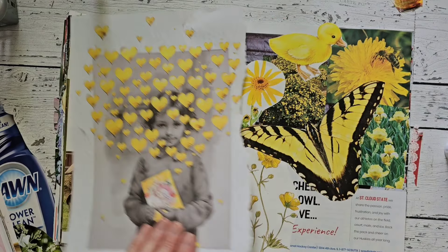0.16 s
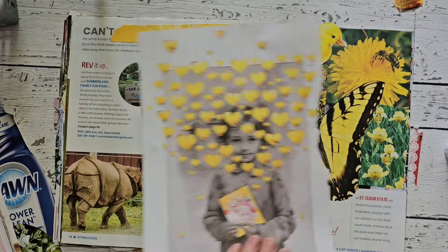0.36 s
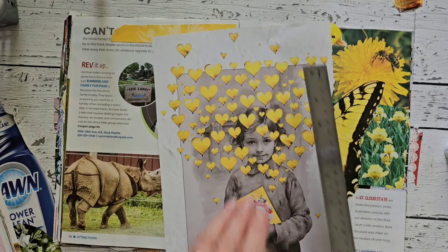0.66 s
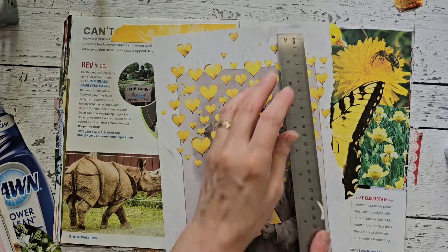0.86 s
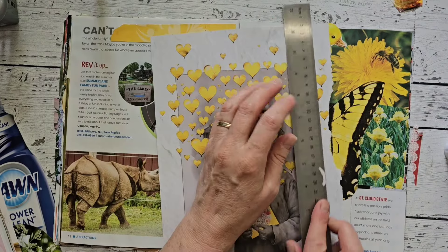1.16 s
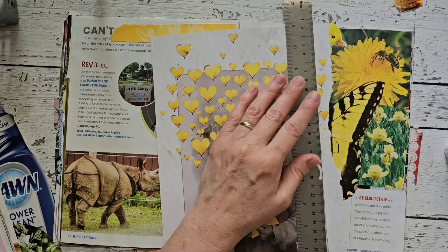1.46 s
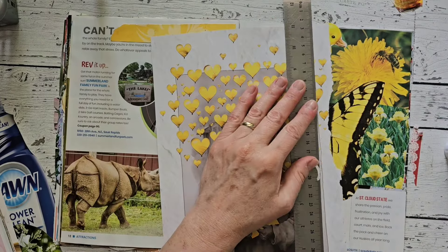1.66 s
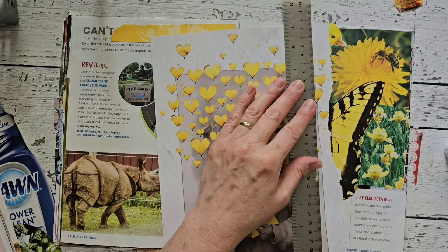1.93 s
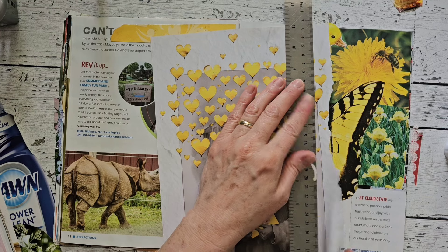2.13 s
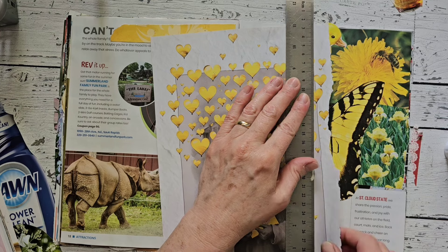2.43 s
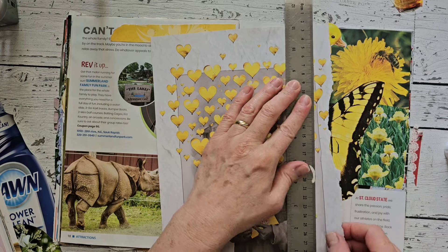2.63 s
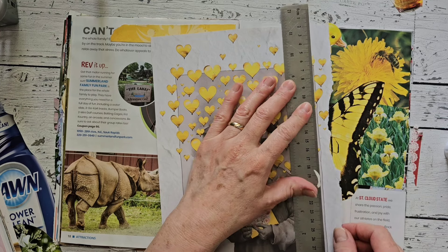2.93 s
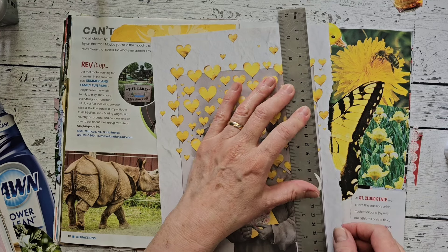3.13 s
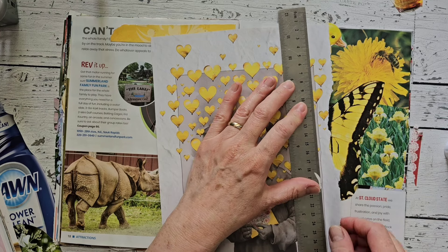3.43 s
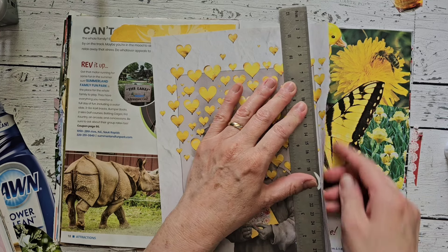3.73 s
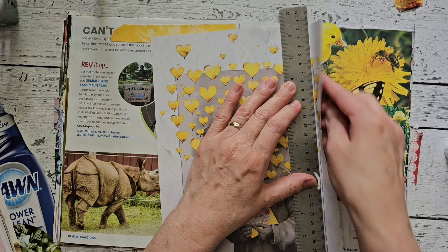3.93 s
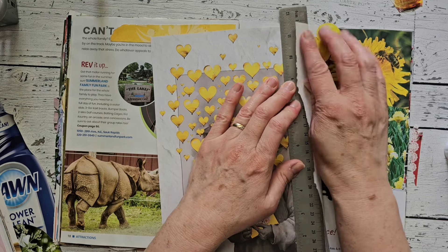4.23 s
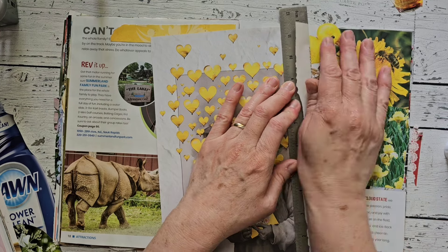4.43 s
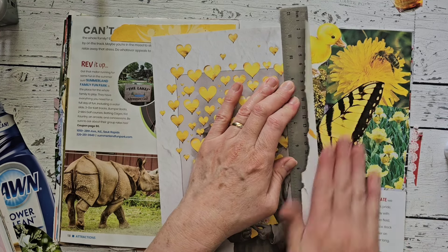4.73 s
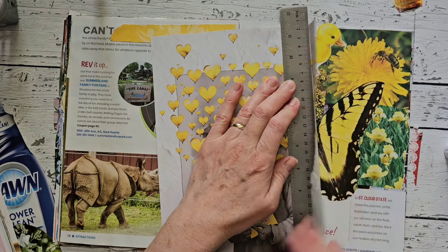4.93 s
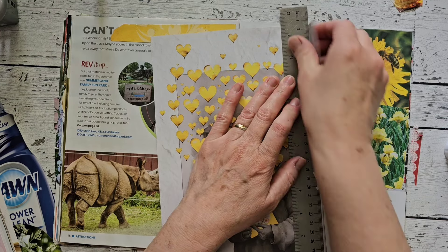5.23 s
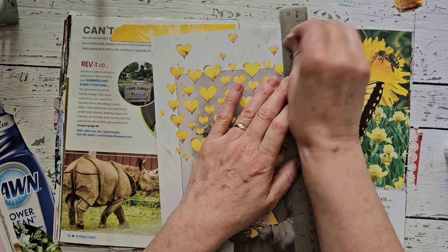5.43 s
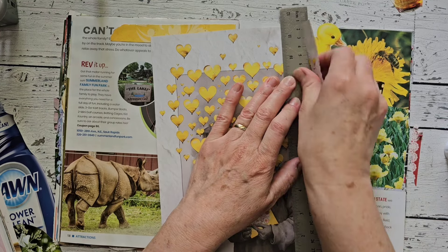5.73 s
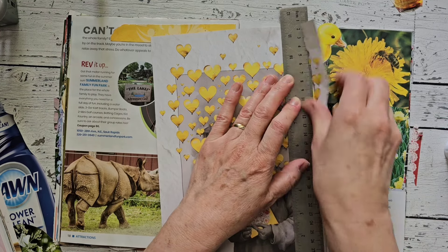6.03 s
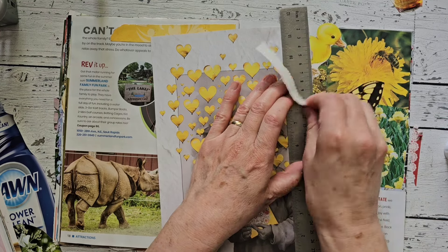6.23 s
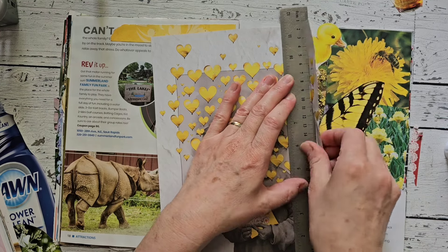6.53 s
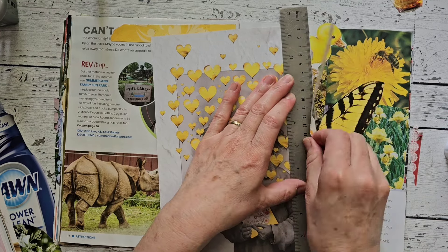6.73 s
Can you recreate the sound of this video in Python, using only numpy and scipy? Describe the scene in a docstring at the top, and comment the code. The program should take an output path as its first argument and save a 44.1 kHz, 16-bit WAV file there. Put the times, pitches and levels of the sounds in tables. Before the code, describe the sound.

A close overhead stereo microphone in a small dry room, with low rumble, faint hiss and a steady soft hum throughout. From 0 to 0.6 s a page glides over a magazine in light papery swishes. At about 0.55 s a ruler squeaks faintly, then from 0.75 to 1.2 s it chatters and sings thinly as it is placed. After a brief quiet, fingers rub the margin: two strong short scuffs near 1.9 and 2.05 s, a crisp snap at 2.5 s, more strokes until 3. Between 3.35 and 5.2 s the edge is folded and smoothed, with a hollow sinking rub around 4.5 s and dull bumps from 3.8 s. Loud crisp rips burst at 5.35 and 5.4 s, softer tears near 5.5, 5.75 and 5.87, then sharp rips at 6.1 and 6.2 s with a bright snap. Small ticks, rustles and low bumps follow to the end near 7 s.

```python
"""A page glides over a magazine on a craft table, in fine grains of filtered noise, with a low hum throughout.
The sheet snaps in brief rings as it buckles; fingertips squeak faintly; a steel ruler chatters and sings in its
bending modes. The margin is folded up and smoothed by hand, with hollow wobbles and table bumps of boom and
dull knock, then torn off along the ruler in short rips of clumped noise. A close stereo microphone overhead, in
a small dry room with a few near echoes and a short tail."""
import sys
import numpy as np
from scipy import signal
from scipy.fft import rfft, irfft
from scipy.io import wavfile
from scipy.ndimage import uniform_filter1d

SR = 44100
rng = np.random.default_rng(int(sys.argv[2]) if len(sys.argv) > 2 else 0)


def to_wav(sig):
    """Store sig (one row per channel, or 1-D mono) as 16-bit WAV at the path in sys.argv[1].

    Samples outside -1..1 are clipped; the rate is SR.
    """
    pcm = np.clip(np.atleast_2d(sig), -1, 1) * 32767
    pcm = np.round(pcm).astype(np.int16)
    wavfile.write(sys.argv[1], SR, pcm.T)  # frames by channels


N = 303040
HZ = np.fft.rfftfreq(N, 1 / SR)
TIME = np.arange(N) / SR

# Colour of the room's air noise. Each row: frequency in Hz, relative density in dB per Hz.
AIR_COLOUR = [(12, 4), (20, 5), (68, 0), (120, 4.5), (168, -12), (277, -7.5), (347, -22.5), (527, -19.5),
              (660, -26.5), (1090, -26.5), (1440, -25.5), (4300, -30), (7310, -33), (9950, -45),
              (16000, -40.5)]
# Hum tones. Each row: frequency in Hz, mean level in dB.
HUM_TONES = [(118.4, -58.5), (242.2, -77)]
# A faint steady room tone, one row: frequency in Hz, width in Hz, level in dB.
ROOM_WHINE = (1090, 38, -78)
# Likeness of left and right in the air. Each row: frequency in Hz, coherence from 0 to 1.
AIR_COHERENCE = [(60, 0.95), (130, 0.92), (300, 0.53), (1000, 0.15), (4000, 0.072), (15000, .05)]
# Likeness of left and right in the paper. Each row: frequency in Hz, coherence from 0 to 1.
PAPER_COHERENCE = [(200, 1), (1300, 0.51), (3000, 0.59), (7000, 0.27), (15000, 0.17)]
# The page gliding over the magazine. Each row: start in seconds, length in seconds, hiss level in dB.
PAGE_SLIDES = [(0, 0.29, -60), (0.107, 0.034, -55), (0.306, 0.094, -52), (0.377, 0.063, -60.5),
               (0.531, 0.056, -71), (0.725, 0.47, -63.5), (0.91, 0.15, -59), (1.177, 0.056, -58.5)]
# Fingers creasing and smoothing the margin.
# Each row: start in seconds, length in seconds, hiss level in dB, fizz re hiss in dB.
MARGIN_RUBS = [(1.541, 0.16, -67.5, -1.5), (1.933, 0.047, -43, -9.5), (1.977, .055, -59, 3),
               (2.049, 0.093, -42, -8.5), (2.156, 0.24, -58, -5.5), (2.393, 0.21, -58.5, -1),
               (2.628, 0.092, -57, -6), (2.751, 0.16, -49, -3), (2.943, 0.066, -52.5, -5),
               (3.35, 0.17, -59, 3.5), (3.557, 0.39, -53.5, 0.5), (3.89, 0.12, -71, 6),
               (3.993, 0.039, -55, 4), (4.03, .15, -52.5, -3), (4.202, .13, -60, -0.5),
               (4.314, 0.088, -52, -2), (4.382, 0.1, -57.5, -4), (4.487, 0.39, -52.5, 5),
               (4.9, 0.034, -54, -4), (5.047, .1, -61, -1), (5.14, 0.14, -64, -4.5),
               (5.611, 0.11, -56, -6.5), (5.812, 0.23, -66, -5), (5.966, 0.082, -50.5, -7),
               (6.34, 0.11, -58, -9), (6.446, 0.28, -70.5, -2), (6.53, 0.03, -54, -10)]
# Colour of rubbed paper. Each row: frequency in Hz, relative density in dB per Hz.
RUBBED_COLOUR = [(110, -4), (180, 0.5), (419, -29.5), (496, -10.5), (793, -13.5), (1180, -5.5),
                 (1710, -7.5), (3300, -2), (3910, -2.5), (4630, 1), (6870, -7.5), (7550, -6.5),
                 (10400, -17.5), (15100, -14), (16000, -70)]
# The hollow under the folded margin, sinking as the hand works along it.
# Each row: time in seconds, resonance in Hz, level re the sheet's plain body in dB.
FOLD_HOLLOW = [(3.55, 2130, -25), (3.62, 2130, 4), (3.9, 2040, -23), (4.2, 1480, -18), (4.42, 1330, -9),
               (4.58, 1070, 5.5), (4.68, 1050, -45)]
# Sharp snaps: the sheet buckling or slapping down, and fibres cracking within the rips. Each row: time in
# seconds, relative strength in dB, ring in Hz.
SHEET_SNAPS = [(.368, -37.5, 1040), (0.4544, -20.5, 6250), (0.905, -39, 1020), (1.24, -33.5, 1090),
               (2.054, -21.5, 3540), (2.149, -30.5, 4600), (2.231, -23.5, 2420), (2.258, -28, 2370),
               (2.349, -38.5, 1500), (2.519, -7.5, 3670), (2.732, -33.5, 2240), (3.441, -33, 1410),
               (3.569, -38, 3050), (4.108, -34.5, 1950), (4.5, -43, 1180), (4.584, -47, 1110),
               (4.693, -25, 2850), (5.367, -24.5, 1470), (5.391, -17, 4800), (5.419, -13, 7350),
               (5.663, -36.5, 1430), (5.74, -18, 7500), (5.836, -43, 1260), (6.094, -36.5, 2000),
               (6.151, -25, 1020), (6.193, -8.5, 5650), (6.285, -25, 3730), (6.608, -19, 7200),
               (6.836, -36.5, 1270)]
# Faint squeaks of fingertips on the page. # Each row: start in seconds, length in seconds, pitch in Hz, level
# in dB.
FINGER_SQUEAKS = [(0.54, 0.12, 1375, -69), (1.59, 0.224, 3280, -69.5)]
# The ruler dragged into place. Each row: time in seconds, relative level in dB.
RULER_DRAG = [(.56, -90), (.75, -97), (.87, -68), (.96, -68), (1.06, -73), (1.21, -71), (1.28, -89)]
# The ruler's bending modes. Each row: frequency in Hz, relative level in dB, free 60 dB decay in seconds.
RULER_MODES = [(2210, -15.5, 0.085), (4270, 2.5, 0.051), (4600, -9, 0.076), (5300, -16, 0.089),
               (8100, -19, 0.3), (11460, -17, 0.26), (12250, -14, 0.12)]
# The ruler touching down and shifting. Each row: time in seconds, relative strength in dB.
RULER_CLINKS = [(.7538, -30), (0.9443, -29), (0.9529, -28), (1.2, -38)]
# Hands bumping the table. Each row: time in seconds, relative strength in dB, boom in Hz.
TABLE_BUMPS = [(1.318, -45, 161), (2.181, -35.5, 73), (3.788, -40, 81.6), (3.819, -35, 86),
               (4.019, -30.5, 51.7), (4.11, -26, 69), (4.185, -35, 57), (4.693, -31.5, 83.5),
               (4.995, -26, 68.3), (5.033, -34.5, 77.5), (5.347, -27.5, 107), (5.385, -28.5, 70),
               (5.549, -38, 96), (5.624, -34.5, 74), (5.739, -34.5, 179), (5.904, -38.5, 154),
               (5.97, -30.5, 78), (6.109, -34, 77), (6.279, -32, 117), (6.356, -37, 67.5),
               (6.407, -41.5, 161), (6.541, -36.5, 105), (6.602, -38, 83), (6.696, -36, 129),
               (6.789, -35.5, 99), (6.823, -33, 98.5)]
# The loose sheet bowing with a hollow wobble. Each row: time in seconds, relative strength in dB.
SHEET_FLAPS = [(1.322, -56), (1.927, -48.5), (1.957, -44), (1.994, -57), (4.908, -52.5), (4.996, -58),
               (6.698, -53)]
# Short pulls that tear the strip. Each row: start in seconds, rise in seconds, length in seconds,
# hiss level in dB, first body re hiss in dB, fizz re hiss in dB.
TEARING_PULLS = [(2.252, 0.0011, 0.0033, -41.5, -3, 2.5), (5.3481, 0.0012, 0.079, -30.5, -9, 2.5),
                 (5.408, 0.0064, 0.05, -33, -20, -2.5), (5.497, 0.03, 0.049, -45, -9, -4),
                 (5.733, 0.025, 0.051, -43.5, -12, 9.5), (5.869, 0.0074, 0.0074, -40.5, -5, -2),
                 (6.106, 0.00057, 0.078, -30.5, -7.5, -7.5), (6.178, 0.0024, 0.029, -29, -18, .5),
                 (6.248, 0.016, 0.034, -46.5, -11, -1), (6.283, 0.00084, 0.011, -45, -3, 1.5),
                 (6.402, .001, 0.0063, -57, 2, 3.5), (6.605, 0.0031, 0.0065, -39, -9, 0.5),
                 (6.786, 0.0023, 0.0076, -50, 2, 1.5), (6.794, 0.018, 0.14, -58.5, 3, 9.5)]
# Colour of torn paper. Each row: frequency in Hz, relative density in dB per Hz.
TORN_COLOUR = [(250, -27.5), (420, -9), (653, -6.5), (772, -10.5), (1020, -2.5), (1220, -10), (1360, -7),
               (1810, -8.5), (3140, -21), (4380, -14), (6420, -18), (7590, -15.5), (10100, -27.5),
               (11600, -20), (16000, -28)]
# Decay of the small room. Each row: frequency in Hz, 60 dB decay in seconds.
ROOM_DECAY = [(150, 0.23), (1000, 0.093), (4000, 0.11), (9000, 0.13), (16000, 0.15)]
# Echoes off things close by. Each row: nominal delay in seconds, level re direct sound in dB.
NEAR_ECHOES = [(.0062, -13), (.0071, -32), (0.0099, -34)]

AIR_DB = -53.5
SLIDE_BODY_DB, SLIDE_FIZZ_DB = -8, -3  # re the hiss
RUB_BODY_DB, USUAL_RUB_DB = -1.5, -57  # body re hiss in a rub of usual strength
DULLING = 0.43  # dB of body re hiss gained for each dB that a rub is slower
SWELL = 0.46  # a stroke's level follows its speed to this power
RUMBLE_DB = -12.5  # the table top under a rubbing hand, re the paper's body
BEND_S, BEND_DB, BEND_BODY_DB, BEND_FIZZ_DB = 0.032, -59.5, 2, -3  # the sheet rustles through each snap
HOLLOW_WIDTH_HZ = 660
PAGE_SHARE = 0.16  # dB more of the whole page for each dB that a snap is harder
# Knock re bump strength at an 80 Hz boom; a brisker touch booms higher and knocks more.
KNOCK_DB, KNOCK_DB_PER_OCTAVE = -9.5, 7.5
FLAP_HZ = 594
RIP_SAG_DB_PER_S, RIP_RELEASE_S = 217, 0.015  # the pull slackens once the paper gives
LOOSENING_DB_PER_S = 149  # the freed strip grows longer and gives more body
TUG_DB = -13.5  # the table thrums as each pull tugs on it, re the rip's hiss
EDGE_HZ = 16100  # the recorder's upper limit


def gain_of(db):
    """Decibels to amplitude."""
    return 10 ** (np.asarray(db) / 20)


def evened(x):
    """Scales to an rms of one."""
    return x / np.sqrt(np.mean(x ** 2) + 1e-20)


def read(points, hz):
    """Reads a table on a log-frequency axis."""
    f, value = np.transpose(points)
    return np.interp(np.log(hz + 1), np.log(f + 1), value)


def add(mix, s, sound):
    """Mixes rows of samples in at time s."""
    part = mix[:, max(round(s * SR), 0):][:, :sound.shape[-1]]
    part += sound[..., :part.shape[1]]


def band(x, low_hz, high_hz, order=2):
    """Causal band-pass."""
    edges = [low_hz, min(high_hz, SR / 2 - 1)]
    return signal.sosfilt(signal.butter(order, edges, "band", fs=SR, output="sos"), x)


def ringing(spectrum, hz, width_hz):
    """Passes a spectrum through one resonance."""
    return irfft(spectrum / (1 + 2j * (HZ - hz) / width_hz) ** 2, N)


def wander(rate_hz):
    """Slow chance with an rms of one, made on a coarse clock."""
    s = TIME[::32]
    hz = np.fft.rfftfreq(len(s), s[1])
    slow = rfft(rng.standard_normal(len(s))) / (1 + (hz / rate_hz) ** 4)
    return np.interp(TIME, s, evened(irfft(slow, len(s))))


def noise_pair(same, lag_ms=0):
    """Spectra of two partly alike white noises, the left one late by the lag."""
    left, other = rfft(rng.standard_normal((2, N)))
    c = np.clip(read(same, HZ), -1, 1)
    late_left = left * np.exp(-2j * np.pi * HZ * lag_ms / 1000)
    right = c * left + np.sqrt(1 - c ** 2) * other
    return np.array([late_left, right])


def background():
    """Low room rumble, faint hiss, a wavering hum and a thin whine."""
    air = noise_pair(AIR_COHERENCE) * gain_of(read(AIR_COLOUR, HZ))
    out = gain_of(AIR_DB) * evened(irfft(air, N))
    for hz, db in HUM_TONES:
        level = gain_of(db + 0.7 * wander(7.7)) * np.sqrt(2)
        out += level * np.sin(2 * np.pi * hz * TIME + 0.5 * wander(5.4))
    whine_hz, width_hz, whine_db = ROOM_WHINE
    return out + gain_of(whine_db) * evened(ringing(noise_pair(AIR_COHERENCE), whine_hz, width_hz))


def grains(per_s, spread_db, grain_s, smooth):
    """Tiny fibre slips of very unequal size over a share of smooth friction."""
    sizes = gain_of(spread_db * np.minimum(rng.exponential(1, N), 4))
    slips = sizes * (rng.random(N) < per_s / SR)
    power = signal.lfilter([1], [1, -np.exp(-2 / (grain_s * SR))], slips ** 2)
    friction = irfft(noise_pair(PAPER_COHERENCE, lag_ms=0.059), N)
    return rfft(friction * np.sqrt(power / power.mean() + smooth))


def sheet_bands(drive, colour, patchy_db, shift_hz):
    """Splits the sheet's sound into body, hiss and fizz; its resonances shift as it bends."""
    hz, _, z = signal.stft(irfft(drive * gain_of(read(colour, HZ)), N), nperseg=512)
    patches = uniform_filter1d(rng.standard_normal(z.shape[1:]), size=4, axis=0)
    hold = np.exp(-2 * np.pi * shift_hz * 256 / SR)  # 256 samples between frames
    patches = evened(signal.lfilter([1], [1, -hold], patches))
    patches /= 1 + (hz[:, None] / 3000) ** 2  # high modes overlap into an even hiss
    bent = rfft(signal.istft(z * gain_of(patchy_db * patches), nperseg=512)[1][:, :N])
    below_hiss = 1 / (1 + (HZ / 2500) ** 6)
    below_fizz = 1 / (1 + (HZ / 7000) ** 8)
    shares = below_hiss, below_fizz - below_hiss, 1 - below_fizz
    return [evened(irfft(bent * share, N)) for share in shares]


def finger_ticks(per_s, ring_hz=1300, width_hz=600):
    """Fingertips catch on the page and let go with small dull ticks."""
    slips = rng.standard_normal(N) * (rng.random(N) < per_s / SR)
    return evened(ringing(rfft(slips), ring_hz, width_hz))


def hollow(rub):
    """Rubbing sounds the gap under the folded margin: one broad, gliding resonance."""
    s, hz, db = np.transpose(FOLD_HOLLOW)
    turn = np.exp(2j * np.pi * np.cumsum(np.interp(TIME, s, hz)) / SR)
    r = np.exp(-np.pi * HOLLOW_WIDTH_HZ / SR)
    # Shift the moving resonance down to zero, low-pass there, and shift back.
    resonance = (turn * signal.lfilter([1], [1, -2 * r, r * r], rub / turn)).real
    return gain_of(np.interp(TIME, s, db)) * evened(resonance)


def stroke(length, db, body_db, fizz_db):
    """Power of body, hiss and fizz in one stroke that speeds up and slows again."""
    speed = np.sin(np.linspace(0, np.pi, round(length * SR), endpoint=False))
    levels = gain_of(db + np.array([[body_db], [0], [fizz_db]]))
    return (levels * speed ** SWELL) ** 2


def sliding():
    """Paper rubs on paper and skin in dense grains; slow rubs are duller, and the hand rumbles the table."""
    drive = grains(per_s=5000, spread_db=3, grain_s=0.0003, smooth=1)
    body, hiss, fizz = sheet_bands(drive, RUBBED_COLOUR, patchy_db=3, shift_hz=6)
    body = body + gain_of(-8) * finger_ticks(per_s=20) + hollow(irfft(drive, N))
    page, hand = np.zeros((2, 3, N))  # power in the three bands
    for s, length, db in PAGE_SLIDES:
        add(page, s, stroke(length, db, SLIDE_BODY_DB, SLIDE_FIZZ_DB))
    for s, length, db, fizz_db in MARGIN_RUBS:
        body_db = RUB_BODY_DB + DULLING * (USUAL_RUB_DB - db)
        add(hand, s, stroke(length, db, body_db, fizz_db))
    for s, _, _ in SHEET_SNAPS:
        add(page, s - BEND_S / 2, stroke(BEND_S, BEND_DB, BEND_BODY_DB, BEND_FIZZ_DB))
    table_top = evened(band(irfft(noise_pair(AIR_COHERENCE), N), 90, 280, order=1))
    rumble = gain_of(RUMBLE_DB + 6.8 * wander(41)) * np.sqrt(hand[0]) * table_top
    pressure = gain_of(0.6 * wander(25))
    paper = sum(np.sqrt(p) * b for p, b in zip(page + hand, (body, hiss, fizz)))
    return pressure * paper + rumble


def snapping(cycles=0.99, bounce_s=0.000624, bounce=0.21, crackle_s=0.0012, crackle_db=-27,
             flutter_db=-11, flutter_cycles=6, sheet_hz=1250, sheet_s=0.00039, sheet_db=-14,
             usual_db=-25, free_hz=1200, rise_s=0.00006, lag_s=0.00006):
    """A buckle kicks the sheet into a brief ring, mirrored by the table, with a flutter and a crisp crackle."""
    out, t = np.zeros((2, N)), np.arange(2048) / SR
    age = np.maximum(t - 0.0007 - np.array([[lag_s], [0]]), 0)  # after the flight to each microphone
    mirrored_age = np.maximum(age - bounce_s, 0)
    for s, db, hz in SHEET_SNAPS:
        flutter, crackle = rng.standard_normal((2, 2, len(t)))
        ring_s = cycles / hz * (1 + (free_hz / hz) ** 2)  # broad, low bends ring longer than tight folds
        direct, mirrored = (
            (1 - np.exp(-u / rise_s)) * np.exp(-u / ring_s) * np.sin(2 * np.pi * hz * u)
            for u in (age, mirrored_age))
        # The whole page follows the fold.
        page_gain = gain_of(sheet_db + PAGE_SHARE * (db - usual_db))
        page = page_gain * np.exp(-age / sheet_s) * np.sin(2 * np.pi * sheet_hz * age)
        flutter = evened(band(flutter, 1020, hz + 3000)) * np.exp(-age * hz / flutter_cycles)
        crackle = evened(band(crackle, 4500, 14300, order=1)) * np.exp(-age / crackle_s)
        noise = gain_of(flutter_db) * flutter + gain_of(crackle_db) * crackle
        add(out, s, gain_of(db) * (direct + bounce * mirrored + page + (age > 0) * noise))
    return gain_of(4.5) * band(out, 640, 18000, order=3)


def scraping(width_hz=380, squeak_q=9, treble_db_per_octave=-5, catching_db=3):
    """Fingertips squeak faintly on the page; dragging the ruler keeps its modes singing thinly, each catching
    by turns."""
    rub = noise_pair(PAPER_COHERENCE)
    ring = 0
    for hz, db, _ in RULER_MODES:
        tilt_db = treble_db_per_octave * np.log2(hz / 4000)
        ring = ring + gain_of(db + tilt_db + catching_db * wander(25)) * ringing(rub, hz, width_hz)
    s, db = np.transpose(RULER_DRAG)
    drag = np.interp(TIME, s, gain_of(db), left=0, right=0)
    out = gain_of(6) * drag * evened(ring)
    for start, length, hz, squeak_db in FINGER_SQUEAKS:
        swell = np.sin(np.pi * np.clip((TIME - start) / length, 0, 1))
        swell *= gain_of(squeak_db + catching_db * wander(25))
        out += swell * evened(ringing(rub, hz, hz / squeak_q))
    return out


def clinking(damping_s=0.037):
    """The steel strip chatters on the paper and rings in its bending modes, damped by the hand."""
    out, t = np.zeros((2, N)), np.arange(8192) / SR
    touch = (1 - np.exp(-t / 0.00057)) * np.exp(-t / damping_s)
    for s, db in RULER_CLINKS:
        phases = rng.uniform(0, 2 * np.pi, (len(RULER_MODES), 2, 1))
        ring = sum(gain_of(mode_db - 60 * t / t60) * np.sin(2 * np.pi * hz * t + phase)
                   for (hz, mode_db, t60), phase in zip(RULER_MODES, phases))
        add(out, s, gain_of(db - 10.5) * ring * touch)
    return out


def bumping(rise_s=0.0013, ring_s=0.024, knock_s=0.016):
    """A soft hand pushes the table top into a few cycles of boom under a dull knock."""
    out, t = np.zeros((2, N)), np.arange(8192) / SR
    swell = (1 - np.exp(-t / rise_s)) ** 2 * np.exp(-t / ring_s)
    for s, db, hz in TABLE_BUMPS:
        knock_db = KNOCK_DB + KNOCK_DB_PER_OCTAVE * np.log2(hz / 80)
        shared, apart = rng.standard_normal(len(t)), rng.standard_normal((2, len(t)))
        boom = swell / swell.max() * np.sin(2 * np.pi * hz * t)
        knock = evened(band(shared + 2 * apart, 77, 415))
        knock *= (1 - np.exp(-t / 0.008)) * np.exp(-t / knock_s)
        add(out, s, gain_of(db) * (gain_of(-1.5) * boom + gain_of(knock_db) * knock))
    return out


def flapping(rise_s=0.0011, fade_s=0.023, width_hz=300):
    """A bowing sheet pushes air in a short, hollow puff."""
    out, t = np.zeros((2, N)), np.arange(8192) / SR
    swell = (1 - np.exp(-t / rise_s)) * np.exp(-t / fade_s)
    low_hz, high_hz = max(FLAP_HZ - width_hz / 2, 100), FLAP_HZ + width_hz / 2
    for s, db in SHEET_FLAPS:
        air = rng.standard_normal(len(t)) + 0.51 * rng.standard_normal((2, len(t)))
        add(out, s, gain_of(db - 1.5) * swell * evened(band(air, low_hz, high_hz)))
    return out


def tearing():
    """Fibres break in quick clumps against the steel edge; each pull builds, sags and dies away."""
    drive = grains(per_s=2400, spread_db=3, grain_s=0.00024, smooth=0.12)
    body, hiss, fizz = sheet_bands(drive, TORN_COLOUR, patchy_db=4.5, shift_hz=29.8)
    power, t = np.zeros((3, N)), np.arange(16384) / SR
    for s, rise, length, db, first_body_db, fizz_db in TEARING_PULLS:
        torn = np.minimum(t, length)
        sag_db = RIP_SAG_DB_PER_S * np.maximum(torn - rise, 0)
        pull = np.minimum(t / rise, 1) * gain_of(db - sag_db)
        pull *= np.exp(-(t - torn) / RIP_RELEASE_S)
        body_db = first_body_db + LOOSENING_DB_PER_S * (2 * torn - t)  # the strip settles after the pull
        add(power, s, np.array([pull * gain_of(body_db), pull, pull * gain_of(fizz_db)]) ** 2)
    thrum = gain_of(TUG_DB) * evened(band(irfft(noise_pair(AIR_COHERENCE), N), 153, 334))
    unsteady = gain_of(0.98 + 0.77 * wander(79))
    return unsteady * sum(np.sqrt(p) * b for p, b in zip(power, (body, hiss + thrum, fizz)))


def room(x, wet_db, build_s=0.0029):
    """A few near echoes and a short diffuse tail that differs in each channel."""
    hz, t, z = signal.stft(rng.standard_normal((2, 16384)), SR, nperseg=256)
    decay = gain_of(-60 * t / read(ROOM_DECAY, hz)[:, None])
    tail = signal.istft(z * decay, SR, nperseg=256)[1]
    tail *= 1 - np.exp(-(np.arange(tail.shape[1]) / SR / build_s) ** 2)
    tail *= gain_of(wet_db) / np.linalg.norm(tail[0])
    for delay, db in NEAR_ECHOES:
        arrival = np.round(delay * SR * rng.uniform(0.96, 1.04, 2)).astype(int)  # one for each channel
        tail[[0, 1], arrival] += gain_of(db)
    return x + signal.fftconvolve(x, tail, axes=1)[:, :N]


def scene():
    """Paper and ruler heard through the room, with the table bumps and the background added dry."""
    paper_and_ruler = sliding() + snapping() + scraping() + clinking() + flapping() + tearing()
    return room(paper_and_ruler, wet_db=-4) + bumping() + background()


def record(dry):
    """The recorder's band limit."""
    low_pass = signal.firwin(401, EDGE_HZ, window=("kaiser", 7), fs=SR)
    return signal.oaconvolve(dry, low_pass[None], "same", axes=1)


dry = scene()
out = record(dry)
to_wav(out)
```